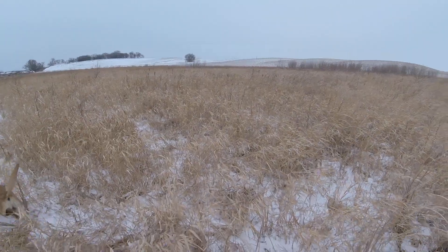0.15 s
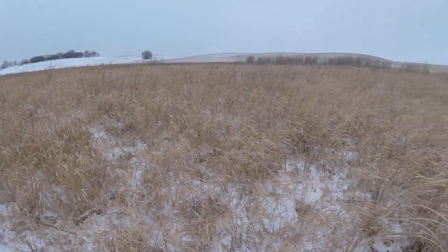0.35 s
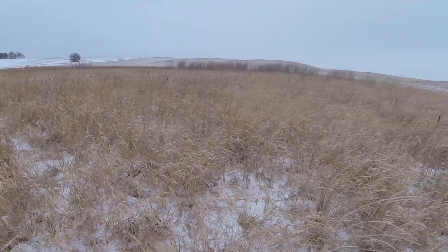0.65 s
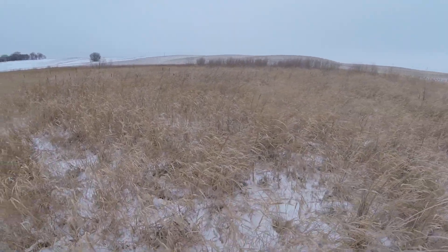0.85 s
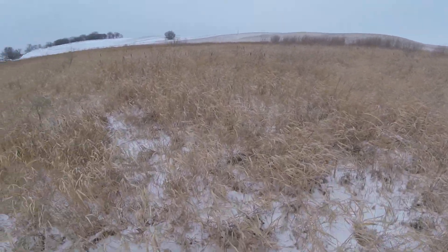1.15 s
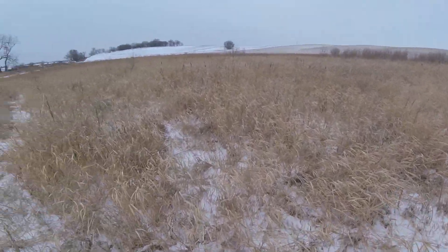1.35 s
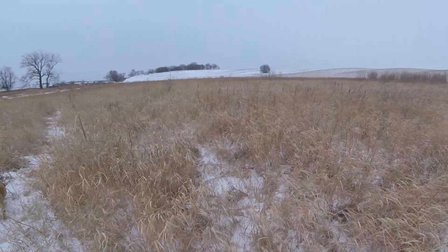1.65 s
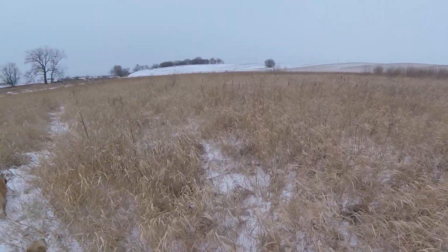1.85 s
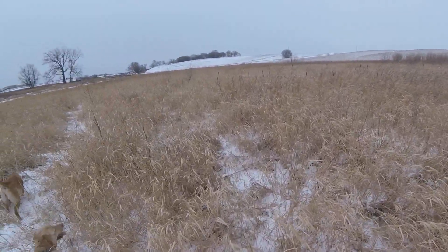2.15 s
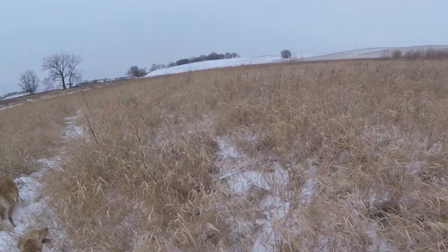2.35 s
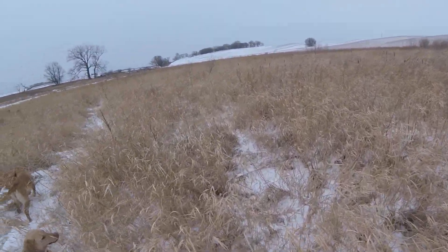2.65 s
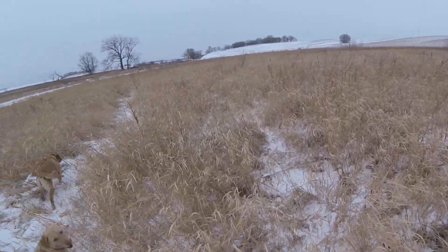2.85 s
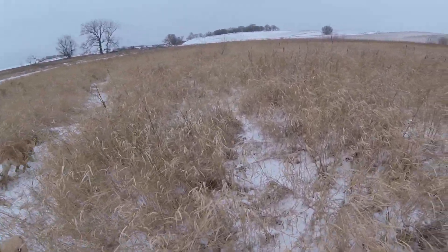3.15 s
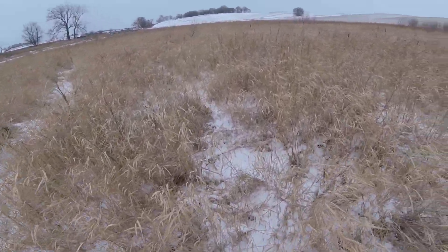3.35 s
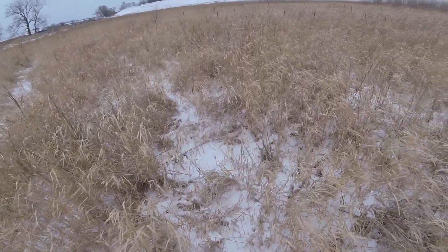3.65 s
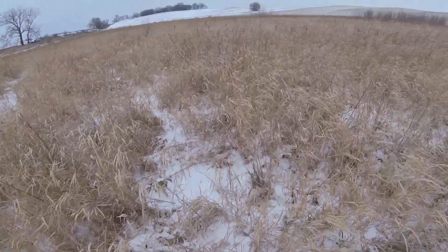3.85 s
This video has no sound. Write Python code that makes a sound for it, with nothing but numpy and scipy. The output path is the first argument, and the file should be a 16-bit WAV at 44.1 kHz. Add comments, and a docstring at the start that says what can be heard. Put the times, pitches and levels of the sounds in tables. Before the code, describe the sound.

Dry grass swishes against walking legs in an open, snowy field. Silence until 0.25 s, then soft, dull brushes near 0.7 and 1.2 s under low wind thumps. Brighter sweeps come at 1.6 and 2.3 s, with a strong wind thump at 2.3 and stalks snapping around 2.4. The loudest swishes are at 3.05 and 3.8 s, with more snaps, faint snow crunches and a final heavy wind buffet near 3.95. Close, dry mono.

```python
"""Walk through dry grass and snow in wind

Legs sweep through tall dry grass: each swish is a dense train of random ticks, brighter when louder.
Single stalks snap as very short noise bursts, and thin snow crunches in duller bursts over a grainy wash.
Wind on the mono microphone is low-passed noise with spells of flutter and brief low thumping eddies.
The sound cuts in after a quarter of a second of silence."""
import sys
import numpy as np
from scipy import signal
from scipy.fft import rfft, irfft
from scipy.io import wavfile

SR = 44100
rng = np.random.default_rng(int(sys.argv[2]) if len(sys.argv) > 2 else 0)


def to_wav(sig):
    """Store sig (one row per channel, or 1-D mono) as 16-bit WAV at the path in sys.argv[1].

    Samples outside -1..1 are clipped; the rate is SR.
    """
    pcm = np.clip(np.atleast_2d(sig), -1, 1) * 32767
    pcm = np.round(pcm).astype(np.int16)
    wavfile.write(sys.argv[1], SR, pcm.T)  # frames by channels


N = 176400  # samples, 4 s


def amp(db):
    """Level law: decibels to amplitude gain."""
    return 10 ** (np.asarray(db) / 20)


def unit(x):
    """Power normalisation: scales a signal to rms 1."""
    return x / np.sqrt(np.mean(x ** 2) + 1e-20)


def clock():
    """Sampling: the time of every sample in seconds."""
    return np.arange(N) / SR


def curve(points):
    """Envelope: gain over time, interpolated in decibels between (s, dB) points."""
    return amp(np.interp(clock(), *np.transpose(points)))


def gaussian(x):
    """Bell curve: 1 at zero, falling to 0.61 at one width."""
    return np.exp(-.5 * x ** 2)


def add(mix, start_s, sound):
    """Superposition: sums a sound into the mix from a given time."""
    part = mix[max(round(start_s * SR), 0):][:len(sound)]
    part += sound[:len(part)]


def colour(x, points):
    """Minimum-phase filtering: the phase is the Hilbert transform of the log gain through (Hz, dB) points."""
    f, db = np.transpose(points)
    hz = abs(np.fft.fftfreq(2 * N, 1 / SR))
    gain_db = np.interp(np.log(hz + 1), np.log(f + 1), db)
    log_gain = np.log(amp(gain_db))
    response = np.exp(np.conj(signal.hilbert(log_gain)))[:N + 1]
    return irfft(rfft(x, 2 * N) * response)[:N]


def hump(x, hz, octaves, body=0):
    """Band emphasis: a zero-phase bell on a log frequency axis, over a flat floor called body."""
    f = np.fft.rfftfreq(len(x), 1 / SR) + 1
    band = gaussian(np.log2(f / hz) / octaves)
    return irfft(rfft(x) * (body + band), len(x))


def wander(hz):
    """Slow random modulation: noise of rms 1 limited to rates up to about hz."""
    f = np.fft.rfftfreq(N, 1 / SR)
    low_pass = np.exp(-(f / hz) ** 2)
    no_drift = f / (f + hz / 10)
    return unit(irfft(rfft(rng.standard_normal(N)) * low_pass * no_drift, N))


def ticks(per_s, spread_db):
    """Shot noise: clicks at random times and signs, most small and a few large."""
    size = np.minimum(rng.exponential(1, N), 6)
    sign = np.sign(rng.standard_normal(N))
    struck = rng.random(N) < per_s / SR
    return amp(spread_db * size) * sign * struck


# sweeps of the legs through the grass, before the grass trim:
# peak_s [s], level_db [dB], rise_s [s], fall_s [s]
LEG_SWEEPS = [(.735, -44.5, 0.07, 0.16), (1.17, -46.5, 0.14, 0.08), (1.573, -38, 0.083, 0.077),
              (1.9, -45, 0.13, 0.7), (2.29, -40, 0.099, 0.17), (2.76, -46, 0.071, 0.038),
              (3.045, -34.5, 0.069, 0.1), (3.27, -43.5, 0.053, 0.077), (3.62, -40, 0.058, 0.046),
              (3.805, -34.5, 0.077, 0.067)]
# grass rustling between the sweeps, before the grass trim: time_s [s], level_db [dB]
RUSTLE_LEVEL = [(.25, -100), (.3, -67), (.52, -59.5), (1.0, -56.5), (1.4, -44), (2.2, -51), (4.0, -43.5)]
# relative spectrum of the rubbing blades: frequency_hz [Hz], density_db [dB per Hz]
BLADE_SPECTRUM = [(300, -15.5), (1200, -22), (2500, -18.5), (3600, -20), (4400, -21), (5100, -10),
                  (5650, -6.5), (6150, -10.5), (6480, 0.5), (6800, -8), (7700, -13), (9200, -13.5),
                  (10300, -19), (11400, -32.5), (13000, -37.5), (14000, -51)]
# gain on the top treble before loudness brightens it: time_s [s], gain_db [dB]
TREBLE_GAIN = [(.5, -14), (1.5, 0.5)]
TICKS_PER_S, TICK_SPREAD_DB, HISS_DB, GRASS_TRIM_DB = 3500, 2.5, 0.5, -2.5
CLUMP_DB, CLUMP_HZ = -0.68, 63.6  # blades slip in bunches
BRIGHT_DB_PER_DB, BRIGHT_HZ, BRIGHT_FROM_DB = 0.19, 7750, -29  # a harder sweep is brighter


def grass():
    """Stick-slip friction: blades tick and slide along the legs, with more treble as the power rises."""
    t = clock()
    power = curve(RUSTLE_LEVEL) ** 2
    for peak_s, level_db, rise_s, fall_s in LEG_SWEEPS:
        width_s = np.where(t < peak_s, rise_s, fall_s)
        sweep = amp(level_db) * gaussian((t - peak_s) / width_s)
        power = power + sweep ** 2
    rub = ticks(TICKS_PER_S, TICK_SPREAD_DB) + amp(HISS_DB) * rng.standard_normal(N)
    rub = rub * amp(CLUMP_DB * wander(CLUMP_HZ))
    rub = unit(colour(rub, BLADE_SPECTRUM))
    high_pass = signal.butter(4, BRIGHT_HZ, "high", fs=SR, output="sos")
    top = signal.sosfiltfilt(high_pass, rub)
    loudness_db = 10 * np.log10(power)
    bright = curve(TREBLE_GAIN) * amp(BRIGHT_DB_PER_DB * (loudness_db - BRIGHT_FROM_DB))
    return amp(GRASS_TRIM_DB) * np.sqrt(power) * (rub + (bright - 1) * top)


# stalks that snap: start_s [s], level_db [dB, peak before the snap filter], pitch_hz [Hz]
STALK_SNAPS = [(0.28, -61, 3000), (.538, -33, 5030), (.545, -34, 3000), (1.084, -27.5, 6000),
               (1.087, -30, 5600), (1.357, -34, 3000), (2.355, -19, 6860), (2.4115, -18, 5800),
               (2.446, -22, 5640), (2.4677, -23, 6880), (3.028, -17.5, 6600), (3.1352, -19, 6060),
               (3.228, -21.5, 6700), (3.333, -29, 5860), (3.493, -27, 7000), (3.528, -26, 7000),
               (3.845, -23, 6400)]
# snap filter, shared by all snaps: frequency_hz [Hz], gain_db [dB]
SNAP_FILTER = [(500, -16), (2500, -5), (4200, -8.5), (5200, 0.5), (9500, -3), (11400, -43)]
SNAP_DECAY_S, SNAP_WIDTH_OCT, SNAP_BODY = 0.00023, 0.18, 0.21
SPLINTER_DB, SPLINTER_S = -15, .003


def snaps():
    """Brittle fracture: a stalk breaks in a sharp band-weighted crack, then splinters for milliseconds."""
    out = np.zeros(N)
    t = np.arange(1024) / SR
    for start_s, level_db, pitch_hz in STALK_SNAPS:
        decay = np.exp(-t / SNAP_DECAY_S) + amp(SPLINTER_DB) * np.exp(-t / SPLINTER_S)
        burst = rng.standard_normal(len(t)) * decay
        padded = np.pad(burst, len(t))  # room for the zero-phase band to ring both ways
        crack = hump(padded, pitch_hz, SNAP_WIDTH_OCT, SNAP_BODY)
        add(out, start_s - len(t) / SR, amp(level_db) * crack / abs(crack).max())
    return colour(out, SNAP_FILTER)


# snow giving way under a boot: middle_s [s], level_db [dB, peak], pitch_hz [Hz]
SNOW_CRUNCHES = [(.55, -45, 660), (0.993, -42.5, 836), (2.57, -43.5, 503), (3.378, -43.5, 580),
                 (3.597, -41, 520), (3.652, -44, 483), (3.754, -38, 740), (3.824, -35.5, 590),
                 (3.877, -37.5, 590)]
CRUNCH_S, CRUNCH_WIDTH_OCT = .0025, .42


def snow_crunches():
    """Granular collapse: each crunch is a short bell-shaped noise burst in a low band."""
    out = np.zeros(N)
    t = np.arange(-1024, 1024) / SR
    for middle_s, level_db, pitch_hz in SNOW_CRUNCHES:
        burst = rng.standard_normal(len(t)) * gaussian(t / CRUNCH_S)
        crunch = hump(burst, pitch_hz, CRUNCH_WIDTH_OCT)
        add(out, middle_s + t[0], amp(level_db) * crunch / abs(crunch).max())
    return out


# eddies that thump the microphone: crest_s [s], level_db [dB, before crest peaking], pitch_hz [Hz at the crest]
EDDY_THUMPS = [(0.286, -31.5, 108), (.42, -33.5, 100), (.553, -30, 230), (0.631, -31.5, 115),
               (0.7, -27.5, 90), (0.783, -25.5, 124), (.869, -33, 130), (.925, -28, 185), (0.932, -26, 139),
               (0.991, -26.5, 216), (1.005, -24.5, 116), (1.566, -23, 48.6), (1.652, -19.5, 116),
               (1.832, -29, 101), (1.886, -26.5, 121), (2.026, -27, 192), (2.2699, -17.5, 124),
               (2.608, -23, 55), (2.662, -28, 108), (2.807, -28.5, 43.4), (3.495, -25, 45.4),
               (3.8, -25, 87), (3.869, -25, 80), (3.887, -24.5, 50), (3.951, -16, 59)]
# spells of rough flutter: middle_s [s], level_db [dB], half_length_s [s]
FLUTTER_SPELLS = [(0.726, -45.5, 0.098), (0.902, -46.5, 0.068), (2.296, -42.5, 0.039),
                  (3.857, -42.5, 0.045), (3.991, -35, 0.028)]
# relative spectrum of the flutter: frequency_hz [Hz], density_db [dB per Hz]
FLUTTER_SPECTRUM = [(30, -19.5), (90, 1), (150, 3.5), (280, -10), (450, -16.5), (800, -29), (1500, -49),
                    (4000, -68)]
# a swirl dies within a cycle or two; its crests are pointed
THUMP_RISE_CYCLES, THUMP_FALL_CYCLES, THUMP_PEAKING = 0.32, 0.77, 0.13
THUMP_SLOWING_CYCLES = 1.3  # the swirl is fastest at its crest
SCUFF_DB, SCUFF_S, SCUFF_REF_HZ = -17, 0.009, 118  # scuff level holds at the reference pitch


def wind_eddies():
    """Turbulent pressure: flutter is shaped noise; an eddy is a brief slowing swirl with rough air around it."""
    t = clock()
    out = np.zeros(N)
    flutter = unit(colour(rng.standard_normal(N), FLUTTER_SPECTRUM))
    for middle_s, level_db, half_length_s in FLUTTER_SPELLS:
        out += flutter * amp(level_db) * gaussian((t - middle_s) / half_length_s)
    for crest_s, level_db, pitch_hz in EDDY_THUMPS:
        age = (t - crest_s) * pitch_hz  # in cycles at the crest pitch
        turns = np.arcsinh(age / THUMP_SLOWING_CYCLES) * THUMP_SLOWING_CYCLES
        swell = np.exp(-abs(age) / np.where(age < 0, THUMP_RISE_CYCLES, THUMP_FALL_CYCLES))
        swirl = np.cos(2 * np.pi * turns) + THUMP_PEAKING * np.cos(2 * np.pi * 2 * turns)
        scuff_gain = amp(SCUFF_DB) * pitch_hz / SCUFF_REF_HZ
        scuff = scuff_gain * flutter * gaussian((t - crest_s) / SCUFF_S)
        out += amp(level_db) * (swell * swirl + scuff)
    return out


# wind rumble on the microphone: time_s [s], level_db [dB]
RUMBLE_LEVEL = [(.25, -46), (.55, -44.5), (.95, -36), (1.1, -40), (1.4, -44), (1.58, -31.5), (2.15, -46),
                (2.3, -40.5), (2.62, -37.5), (2.73, -42.5), (2.88, -38.5), (3.05, -36.5), (3.4, -39),
                (3.66, -39), (4, -31.5)]
# relative spectrum of the rumble: frequency_hz [Hz], density_db [dB per Hz]
RUMBLE_SPECTRUM = [(25, -1.5), (75, 2), (120, -7), (180, -17), (280, -26), (450, -41), (1000, -77.5)]
GUST_DB, GUST_HZ = 2.5, 22.3


def wind_rumble():
    """Amplitude-modulated noise: random gusts make the low rumble lumpy."""
    gusty = rng.standard_normal(N) * amp(GUST_DB * wander(GUST_HZ))
    return curve(RUMBLE_LEVEL) * unit(colour(gusty, RUMBLE_SPECTRUM))


# soft wash of the field and of trodden snow: time_s [s], level_db [dB]
WASH_ENVELOPE = [(.25, -66), (.33, -59.5), (.55, -58), (.8, -57), (1.25, -59.5), (2.1, -60), (2.85, -56.5),
                 (3.0, -52.5), (3.45, -54), (4, -55)]
# relative spectrum of the wash: frequency_hz [Hz], density_db [dB per Hz]
WASH_SPECTRUM = [(100, 10.5), (400, 8), (750, 4.5), (1250, -2), (2300, -5), (3200, -9.5), (4200, -18.5),
                 (6500, -15), (9000, -55)]
WASH_GRAINS_PER_S, WASH_SPREAD_DB = 4000, 3.5


def field_wash():
    """Incoherent summation: many small grains and steady noise merge into a soft dull wash."""
    grains = ticks(WASH_GRAINS_PER_S, WASH_SPREAD_DB) + rng.standard_normal(N)
    return curve(WASH_ENVELOPE) * unit(colour(grains, WASH_SPECTRUM))


START_S = 0.2459  # silence before this


def scene():
    """Superposition: all pressures add at one microphone, fed equally to both channels."""
    mono = grass() + snaps() + snow_crunches() + wind_eddies() + wind_rumble() + field_wash()
    mono = mono * (clock() >= START_S)
    return np.array([mono, mono])


EDGE_HZ = 13800


def record(dry):
    """Band limiting: a linear-phase low-pass removes the highest treble."""
    low_pass = signal.firwin(511, EDGE_HZ, window=("kaiser", 9), fs=SR)
    return signal.oaconvolve(dry, low_pass[None], "same")


dry = scene()
out = record(dry)
to_wav(out)
```